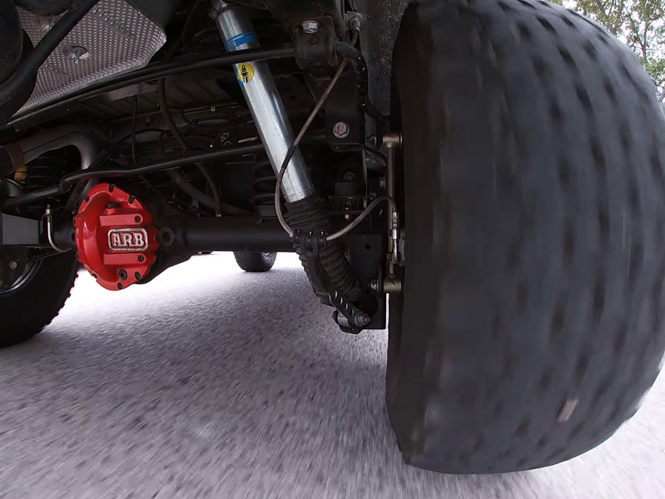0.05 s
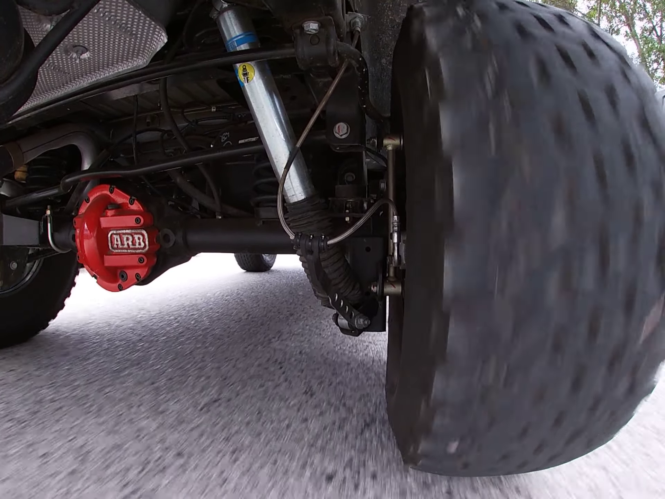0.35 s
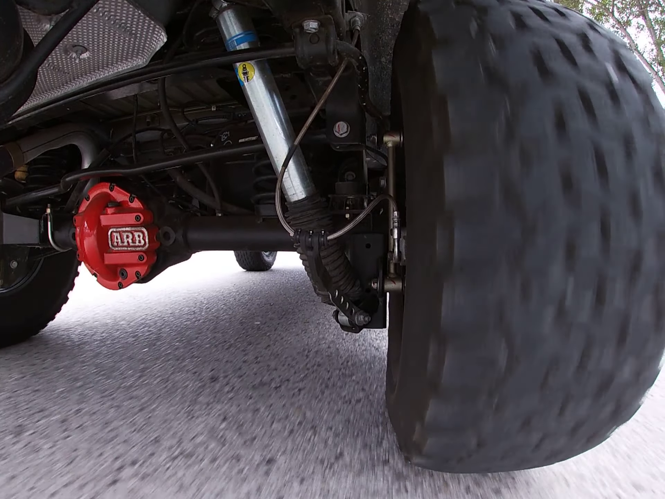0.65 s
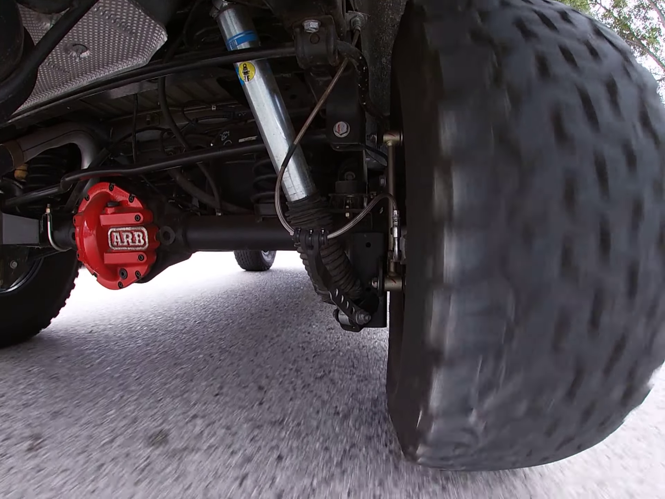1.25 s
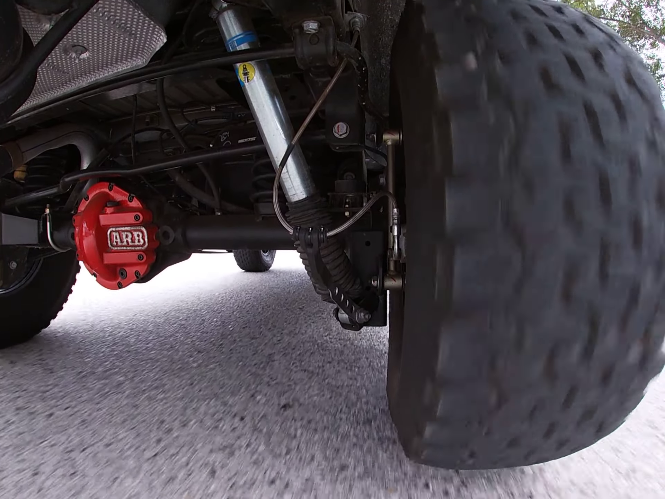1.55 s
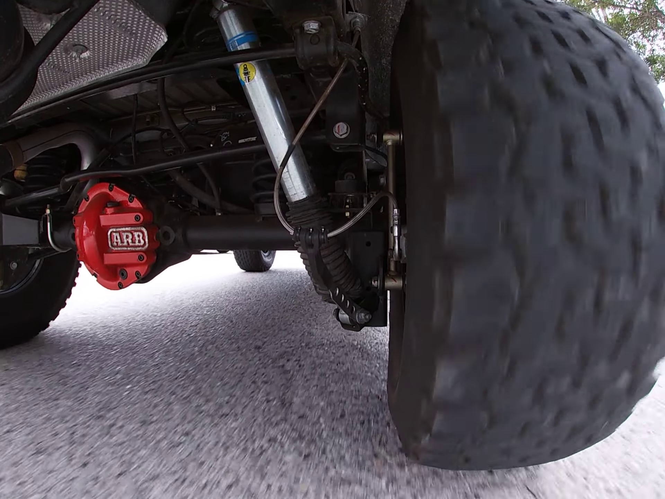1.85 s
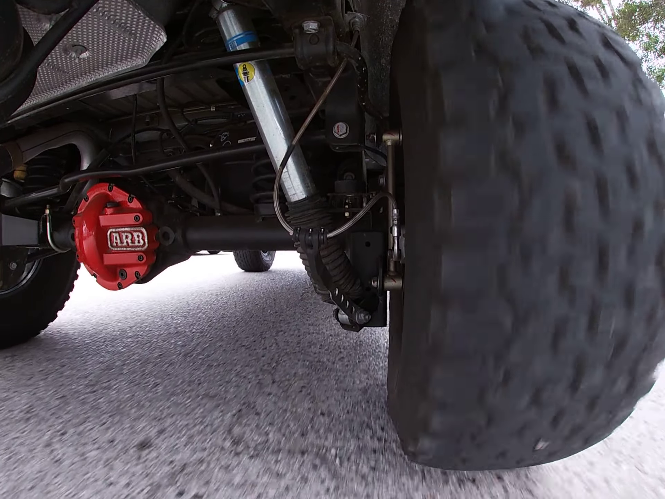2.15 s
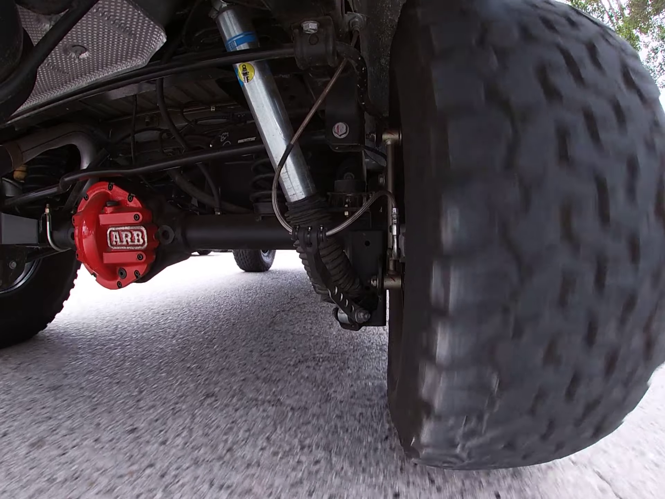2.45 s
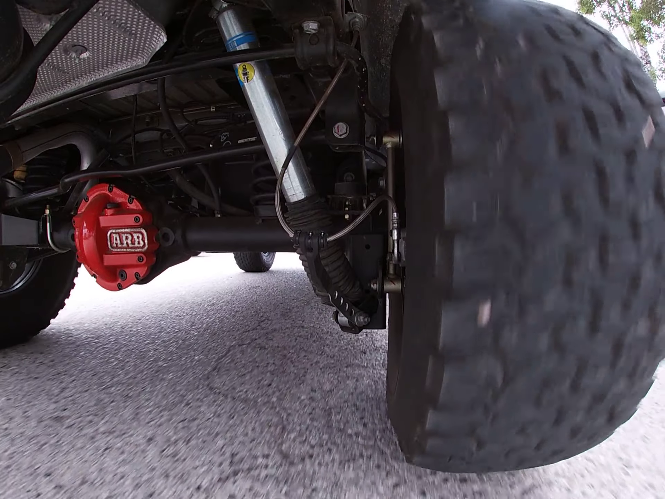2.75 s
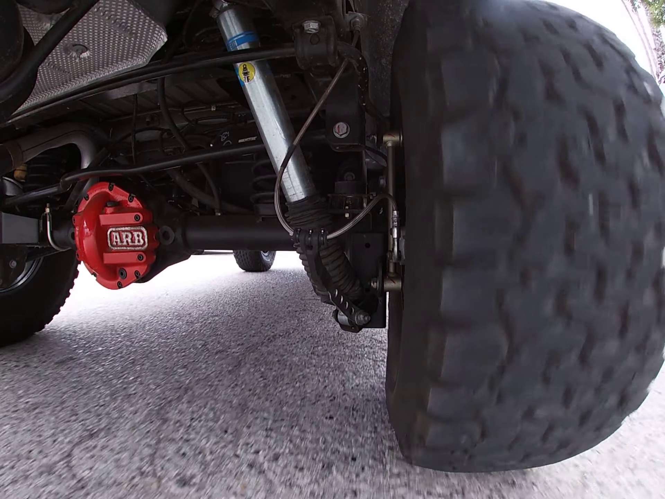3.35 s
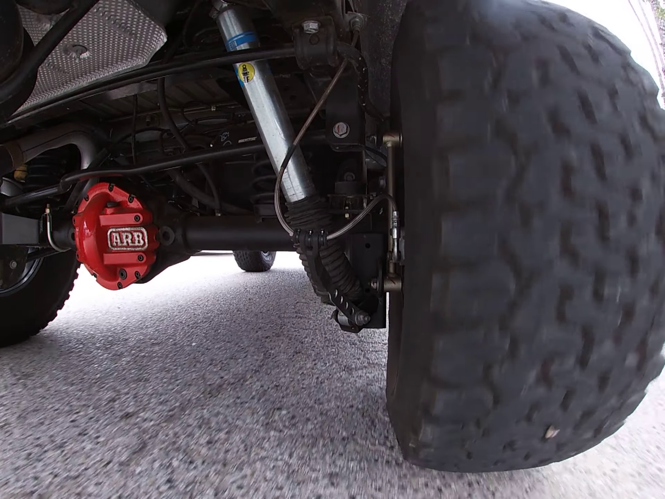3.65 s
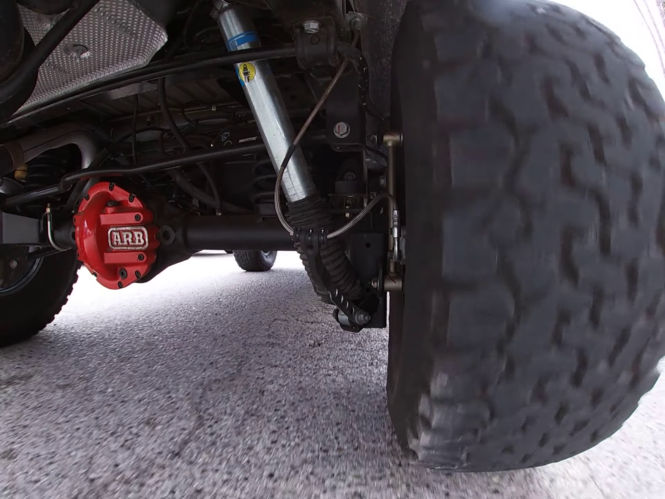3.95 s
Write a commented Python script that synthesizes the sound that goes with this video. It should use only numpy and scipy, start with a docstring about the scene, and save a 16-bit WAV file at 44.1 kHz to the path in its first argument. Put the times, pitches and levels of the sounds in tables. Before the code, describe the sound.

A deep exhaust booms, heard close up under a moving off-road vehicle. From about 0.4 to 1.3 seconds it burbles and stutters as the revs fall, then settles into a low drone. Tyres roar more softly on asphalt throughout, with faint grit. Between 2.2 and 3 seconds come a few suspension knocks, thumps over cracks and one stone click. The engine swells around 3.2 seconds, easing by 4.

```python
"""A booming exhaust comes first, heard from under an off-road vehicle, beside a knobbly front tyre.
The engine burbles as the revs fall, drones, and swells once more under a dab of throttle:
its turning makes the steady tones, and its uneven firings ring the exhaust pipe.
The tyres roar on the asphalt, thump over cracks and throw a little grit at the steel underside.
The suspension knocks now and then, and a thin hiss of air lies behind it all."""
import sys
import numpy as np
from scipy import signal
from scipy.fft import rfft, irfft
from scipy.io import wavfile
from scipy.ndimage import uniform_filter1d, minimum_filter1d

SR = 44100
rng = np.random.default_rng(int(sys.argv[2]) if len(sys.argv) > 2 else 0)


def store_wav(level_fs):
    """Save 16-bit WAV to argv[1]."""
    pcm = np.round(np.clip(np.atleast_2d(level_fs), -1, 1) * 32767)
    wavfile.write(sys.argv[1], SR, pcm.T.astype(np.int16))


N = 176400
T = np.arange(N) / SR
HZ = np.fft.rfftfreq(N, 1 / SR)


# The engine's main tones. Each row: time in seconds, then levels in dB of tones 1, 2 and 3.
MAIN_TONES = [(0, -12.5, -30, -38), (.2, -11.5, -33, -36), (.4, -14, -29, -37.5), (.46, -13, -21.5, -20.5),
              (.55, -24, -32.5, -27), (.7, -20.5, -27, -26.5), (.85, -30, -28, -28.5),
              (1.08, -22.5, -24.5, -35.5), (1.35, -24.5, -23, -37.5), (1.6, -25.5, -17, -31),
              (2.1, -24.5, -16, -35.5), (2.3, -24.5, -19.5, -30), (2.85, -26, -20.5, -33),
              (3.06, -26, -17.5, -31.5), (3.17, -22.5, -24.5, -30), (3.215, -27, -17, -18),
              (3.27, -15.5, -18, -16), (3.4, -16, -20.5, -17.5), (3.56, -22, -26, -17),
              (3.72, -29.5, -27.5, -27), (4, -28, -29.5, -34)]
# Weaker tones. Each row: tone number, the main tone it follows, how many dB below that it lies.
OVERTONES = [(4, 2, 17), (5, 1, 32.5), (6, 3, 23.5)]
def drone(turns, waver_hz=10):
    """The engine hums in wavering tones: tone k swings k times for each turn of the crankshaft."""
    levels = curves(MAIN_TONES)
    tones = [(k, db - 1.26 * drift(waver_hz)) for k, db in enumerate(levels, 1)]
    for k, leader, below_db in OVERTONES:
        tones.append((round(k), levels[round(leader) - 1] - below_db + 2.5 * drift(waver_hz)))
    return sum(np.sqrt(2) * amp(db) * np.sin(2 * np.pi * (k * turns + rng.random())) for k, db in tones)


def rasp(firings):
    """Gas puffs out with each firing, far quieter than the drone that it follows."""
    first_db, _, third_db = curves(MAIN_TONES)
    puffs = 1 + np.cos(2 * np.pi * firings)
    return amp(np.maximum(first_db, third_db) - 39.5) * puffs * noise(hump(hz=386, octaves=.9))


# The burble's strength. Each row: time in seconds, deep boom in dB, chugging above it in dB.
BURBLE_LEVELS = [(0, -31, -36), (.36, -25.5, -38), (.44, -18.5, -18), (.6, -16.5, -32), (.75, -14.5, -24),
                 (.95, -17, -26), (1.08, -36, -36), (1.25, -26, -25.5), (1.5, -38, -37.5), (2, -36, -34.5),
                 (2.3, -30, -26.5), (2.6, -34.5, -34.5), (3.15, -24, -28.5), (4, -31, -33.5)]
# The pipe's upper notes. Each row: pitch in Hz, width in Hz, relative level in dB.
PIPE_NOTES = [(70.2, 13.6, 1), (124, 32, -2)]
def burble(firings, muffler_hz=145):
    """Uneven firings ring the exhaust pipe: a deep boom with muffled chugging above it."""
    pulses = np.diff(np.floor(firings), prepend=0) * rng.choice([-1., 1.], N)
    boom = steady(resonate(pulses, hz=47.57, width_hz=9.1))
    chug = sum(amp(db) * steady(resonate(pulses, hz, width)) for hz, width, db in PIPE_NOTES)
    chug = filtered(chug, 1 / (1 + (HZ / muffler_hz) ** 12))
    boom_db, chug_db = curves(BURBLE_LEVELS)
    return amp(boom_db) * boom + amp(chug_db) * chug


# Engine speed. Each row: time in seconds, crankshaft turns per second.
REVS = [(0, 51), (.14, 50.3), (.42, 44.4), (.48, 40.3), (.7, 39), (.9, 38), (1.05, 35.8), (1.34, 34.7),
        (1.6, 33.3), (1.82, 32.8), (2.04, 30.1), (2.25, 31.5), (2.5, 33.9), (2.71, 35.5), (3.1, 35.5),
        (3.24, 40.2), (3.35, 41.5), (3.54, 40.3), (3.74, 38), (4, 36)]
# Brief dips in the engine's level. Each row: middle of the dip in seconds, depth in dB.
STUTTERS = [(.5, 3.5), (0.568, 5), (0.656, 3), (.775, 4.5), (0.863, 5.5), (1.06, 4.5), (1.3, 7)]
def engine(stutter_s=.021):
    """The engine fires three times a turn and stutters as the revs fall."""
    turns = np.cumsum(curves(REVS)[0]) / SR
    firings = 3 * turns
    dip_db = sum(db * np.exp(-((T - s) / stutter_s) ** 2) for s, db in STUTTERS)
    return (drone(turns) + rasp(firings) + burble(firings)) * amp(-dip_db)


# The tone colour of the tyres. Each row: frequency in Hz, relative level in dB.
TYRE_COLOUR = [(100, -22), (170, 1), (230, 0), (270, -11.5), (310, -8), (400, -5.5), (520, -5.5),
               (650, -10), (760, -10), (950, -14), (1300, -17.5), (1800, -20), (2050, -23), (2400, -21.5),
               (2900, -24), (3700, -27), (4600, -32.5), (5600, -32), (6300, -37), (7200, -49.5),
               (8500, -54), (10500, -53), (12500, -65.5), (15000, -78)]
# How loud the tyres are. Each row: time in seconds, low roar in dB, high hiss in dB.
TYRE_LEVELS = [(0, -41.5, -49.5), (.2, -44, -52.5), (.6, -50, -52.5), (.85, -44.5, -52.5),
               (1.05, -48.5, -52), (1.45, -44, -49.5), (1.9, -41.5, -49), (2.3, -43, -49.5),
               (2.6, -41, -47.5), (2.9, -40.5, -46.5), (3.1, -43, -46), (3.25, -40, -45),
               (3.45, -46.5, -50), (3.7, -46.5, -50.5), (4, -46.5, -50.5)]
def tyres(split_hz=1300, patch_db=1.26, flicker_db=.04):
    """Tread on coarse asphalt makes a patchy roar and a hiss of squeezed air."""
    # Lay noise out by pitch and time, then make random patches louder or softer.
    grid = signal.stft(rng.standard_normal(N), nperseg=512, noverlap=384)[2]
    patches = uniform_filter1d(rng.standard_normal(grid.shape), size=7, axis=0)
    patches = unit(uniform_filter1d(patches, size=12, axis=1))
    rough = signal.istft(grid * amp(patch_db * patches), nperseg=512, noverlap=384)[1][:N]
    rough *= amp(-flicker_db * drift(hz=90))
    low = 1 / (1 + (HZ / split_hz) ** 4)
    roar = filtered(rough, colour(TYRE_COLOUR) * low)
    hiss = filtered(rough, colour(TYRE_COLOUR) * (1 - low))
    roar_db, hiss_db = curves(TYRE_LEVELS)
    return amp(roar_db) * roar + amp(hiss_db) * hiss


# Cracks and stones under the tyres. Each row: start, rise and decay in seconds,
# level in dB, centre pitch in Hz, width in octaves.
BUMPS = [(.43, 0.011, 0.031, -40, 469, 0.12), (.72, 0.011, 0.022, -43.5, 460, 0.23),
         (.85, 0.016, 0.025, -46, 465, 0.15), (2.41, 0.013, 0.019, -45, 2600, 0.24),
         (2.476, 0.0069, 0.026, -28.5, 680, 1.36), (2.67, 0.034, 0.022, -34, 524, .85),
         (2.729, 0.0055, 0.015, -43.5, 2770, 0.39), (2.919, 0.0026, 0.021, -33, 880, 1.0),
         (3.165, 0.0067, 0.015, -39, 1210, 0.88)]
def bumps(muffle_hz=6500):
    """Each crack gives a short slap of tread, deep or bright."""
    slaps = np.zeros(N)
    muffle = 1 / (1 + (HZ / muffle_hz) ** 10)
    for start, rise, decay, db, hz, octaves in BUMPS:
        attack = np.clip((T - start) / rise, 0, 1)
        tail = np.exp(-np.maximum(T - start - rise, 0) / decay)
        slaps += amp(db) * attack * tail * noise(muffle * hump(hz, octaves))
    return slaps


# Jolts. Each row: start, rise and decay in seconds, strength in dB, pitch in Hz.
KNOCKS = [(.725, 0.014, 0.016, -29, 229), (2.235, 0.0026, 0.0074, -25.5, 345),
          (2.48, .004, 0.01, -24.5, 389), (2.694, 0.015, 0.016, -20, 405)]
# The notes in one knock. Each row: multiple of its pitch, relative level in dB.
KNOCK_NOTES = [(1, 0), (1.27, -7), (1.98, -14.5), (2.8, -15)]
def knocks():
    """Hard jolts make the suspension ring briefly."""
    jolts = np.zeros(N)
    for start, rise, decay, db, hz in KNOCKS:
        notes = [(hz * multiple, note_db) for multiple, note_db in KNOCK_NOTES]
        jolts += amp(db) * ring(start, rise, decay, notes)
    return jolts


# The notes in the stone's click. Each row: pitch in Hz, relative level in dB.
STONE_NOTES = [(3200, 7), (4310, -7), (5380, -5)]
def stone():
    """One flung stone clicks on steel."""
    return amp(-25.5) * ring(start=2.5273, rise=.0008, decay=.0008, notes=STONE_NOTES)


# The underbody's notes. Each row: pitch in Hz, width in Hz, relative level in dB.
BODY_NOTES = [(198, 48, -8.5), (240.7, 29, 0.5), (298.3, 16, 0), (332.3, 11, 1.5), (459, 33, -9),
              (525, 37, -6.5)]
# How loudly it rings. Each row: time in seconds, level in dB.
BODY_LEVELS = [(0, -63.5), (.45, -52), (.6, -66.5), (1.2, -62), (1.8, -47), (2.55, -53), (2.72, -41.5),
               (3.0, -42.5), (3.15, -46.5), (3.8, -57.5), (4, -62)]
def underbody():
    """Random shaking from the road keeps the underbody ringing."""
    ringing = sum(amp(db) * resonate(rng.standard_normal(N), hz, width) for hz, width, db in BODY_NOTES)
    return amp(curves(BODY_LEVELS)[0]) * unit(ringing)


# The breathy note of the tread. Each row: time in seconds, level in dB.
GROOVE_LEVELS = [(0, -76.5), (1.2, -57.5), (2.6, -56.5), (3.2, -54), (4, -60)]
def grooves():
    """Air rings in the grooves of the tread."""
    return amp(curves(GROOVE_LEVELS)[0]) * resonate(rng.standard_normal(N), hz=2820, width_hz=790)


# The tone colour of grit on steel. Each row: frequency in Hz, relative level in dB.
STEEL_COLOUR = [(800, -32.5), (2000, -5), (3200, 7), (4500, -6.5), (5700, 2), (7200, -15.5), (9000, -21.5),
                (10300, -17.5), (11300, -19.5), (12200, -19), (14000, -31.5)]
def grains(per_second, scuff_s, spread_db=2.5):
    """Grains land at random, each a short soft scuff on steel."""
    hits = rng.random(N) < per_second / SR
    strengths = amp(spread_db * np.minimum(rng.exponential(1, N), 4))
    pole = np.exp(-1 / (scuff_s * SR))
    envelope = signal.lfilter([1], np.poly([pole, pole]), hits * strengths)  # each hit swells and fades
    return filtered(envelope * rng.standard_normal(N), colour(STEEL_COLOUR))


# Sprays of grit. Each row: start in seconds, decay in seconds, level in dB.
SPRAYS = [(1.452, 0.02, -49), (1.542, 0.015, -48), (1.929, 0.023, -44.5)]
# Loose grit on the road. Each row: time in seconds, relative level in dB.
LOOSE_GRIT = [(0, -4), (1.1, -10.5), (1.5, -4.5), (2.3, -6.5), (2.8, 1.5), (3.3, 0), (3.6, -5.5), (4, -3)]
def grit():
    """Stray grit scuffs faintly; now and then a dense spray hits the underside."""
    bursts = sum(amp(db) * (T > s) * np.exp(-np.maximum(T - s, 0) / decay) for s, decay, db in SPRAYS)
    sprays = bursts * grains(per_second=3700, scuff_s=.0018)
    strays = amp(curves(LOOSE_GRIT)[0] - 60.5) * grains(per_second=73, scuff_s=.0025)
    return sprays + strays


# Passing air. Each row: time in seconds, level in dB.
AIR_LEVELS = [(0, -68), (.2, -68.5), (.5, -80.5), (3.4, -82), (3.75, -73), (4, -63)]
def air():
    """A thin hiss of passing air fades out and later returns."""
    return amp(curves(AIR_LEVELS)[0]) * noise(hump(hz=6300, octaves=.24))


def amp(db):
    """Turns decibels into a gain."""
    return 10 ** (np.asarray(db) / 20)


def unit(x):
    """Scales a signal to an average strength (rms) of 1."""
    return x / np.sqrt(np.mean(x ** 2) + 1e-20)


def curves(table):
    """Joins a table's points in time with straight lines, one curve per value column."""
    times, *columns = np.transpose(table)
    return [np.interp(T, times, column) for column in columns]


def colour(points):
    """A gain for every frequency, from rows of Hz and dB."""
    hz, db = np.transpose(points)
    return amp(np.interp(np.log(HZ + 1), np.log(hz), db))


def hump(hz, octaves):
    """A bell-shaped band of frequencies."""
    return np.exp(-.5 * (np.log2((HZ + 1) / hz) / octaves) ** 2)


def filtered(x, gains):
    """Gives each frequency its gain, then scales to strength 1."""
    return unit(irfft(rfft(x) * gains, N))


def noise(gains):
    """Noise with the given tone colour."""
    return filtered(rng.standard_normal(N), gains)


def drift(hz):
    """Random wandering up to about the given rate."""
    return noise(1 / (1 + (HZ / hz) ** 4))


def resonate(x, hz, width_hz):
    """Makes a signal ring around one pitch."""
    detuning = (HZ ** 2 - hz ** 2) / (width_hz * (HZ + 1))
    return filtered(x, 1 / (1 + 1j * detuning) ** 2)


def steady(x, window_s=.034):
    """Evens out a signal's strength and leaves its wandering pitch."""
    power = uniform_filter1d(abs(signal.hilbert(x)) ** 2, round(window_s * SR))
    return unit(x / np.sqrt(power + 1e-9))


def ring(start, rise, decay, notes):
    """A cushioned blow sets off notes that die away; times are in seconds."""
    age = np.maximum(T - start, 0)
    envelope = (1 - np.exp(-(age / rise) ** 2)) * np.exp(-age / decay)
    return envelope * sum(amp(db) * np.sin(2 * np.pi * hz * age) for hz, db in notes)


def scene():
    """All the sources, heard close up in one channel."""
    rolling = engine() + tyres() + underbody() + grooves() + air()
    return (rolling + bumps() + knocks() + stone() + grit())[None]


def record(dry, ceiling_db=-7, hold_s=.025, fade_s=.006, cutoff_hz=14500):
    """Eases the loudest peaks down, fades the very end and cuts the highest treble."""
    hold = round(hold_s * SR)
    gain = np.minimum(1, amp(ceiling_db) / (abs(dry) + 1e-9))
    gain = minimum_filter1d(gain, hold)
    gain = uniform_filter1d(uniform_filter1d(gain, hold // 2), hold // 2)
    fade = np.minimum(T[::-1] / fade_s, 1)
    treble_cut = signal.firwin(511, cutoff_hz, window=("kaiser", 9), fs=SR)
    return signal.oaconvolve(dry * gain * fade, treble_cut[None], "same")


dry = scene()
out = record(dry)
store_wav(out)
```